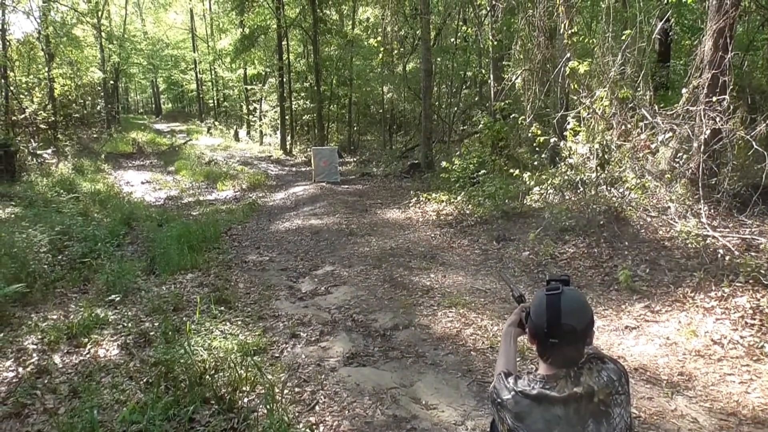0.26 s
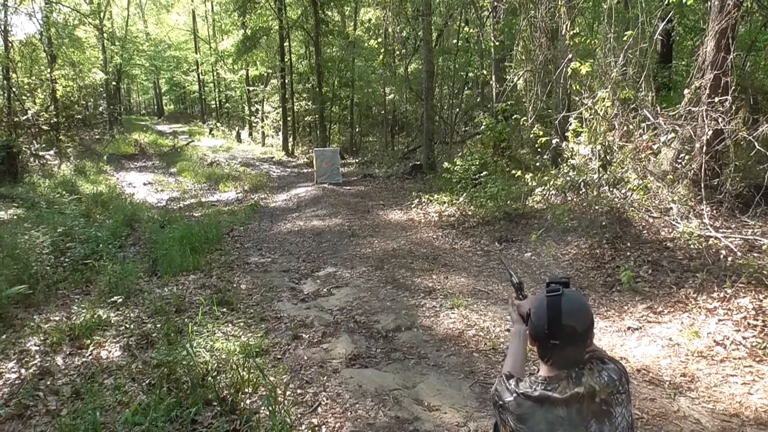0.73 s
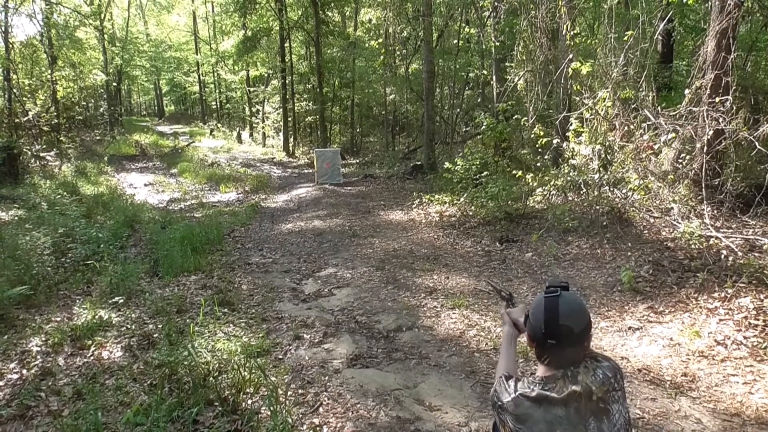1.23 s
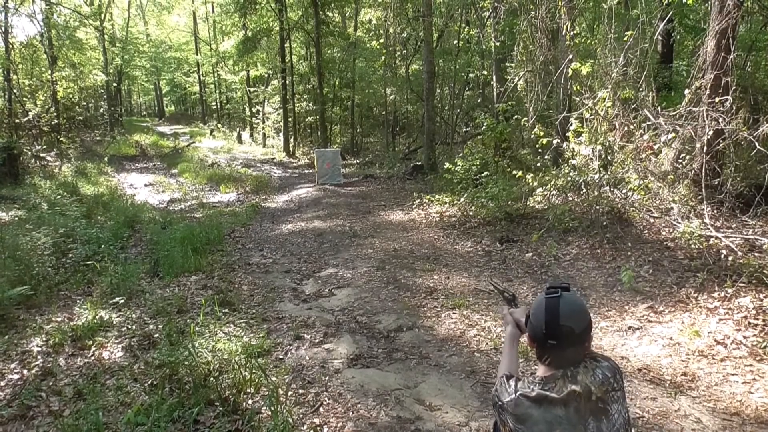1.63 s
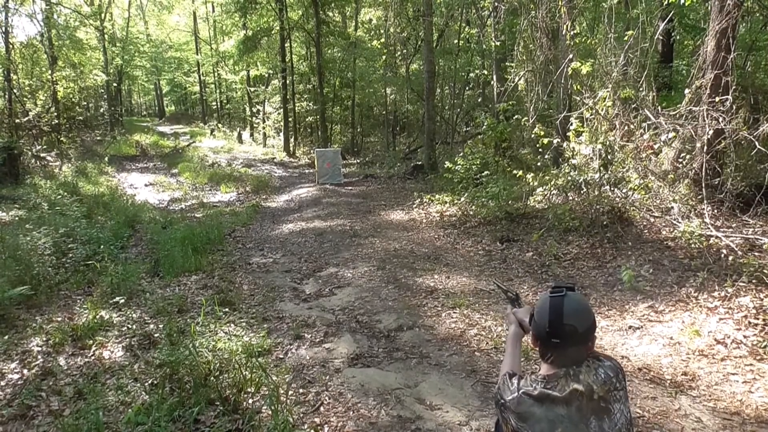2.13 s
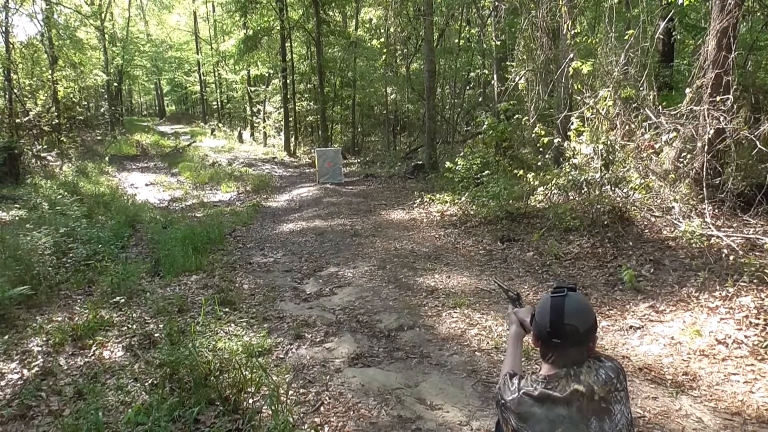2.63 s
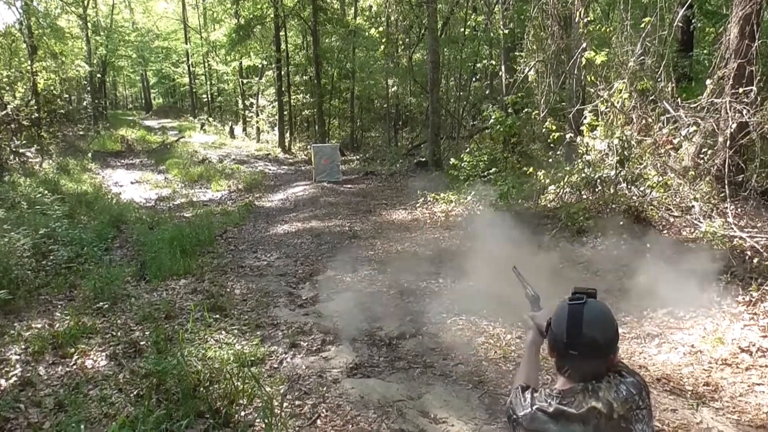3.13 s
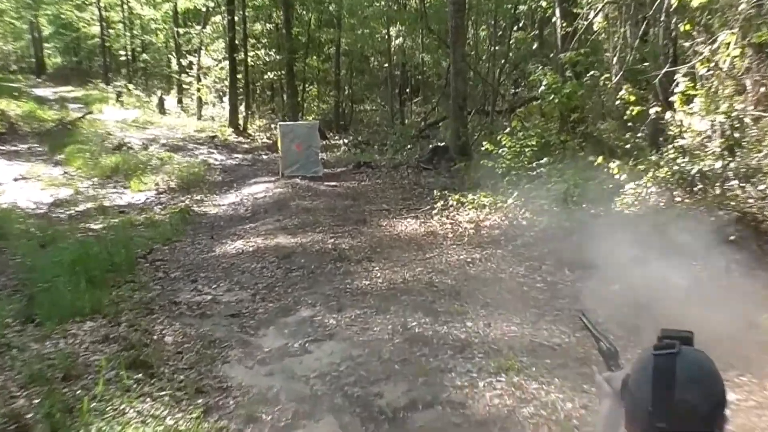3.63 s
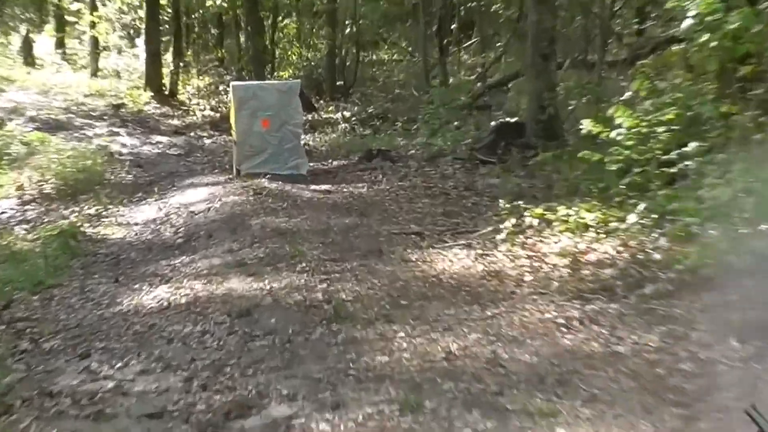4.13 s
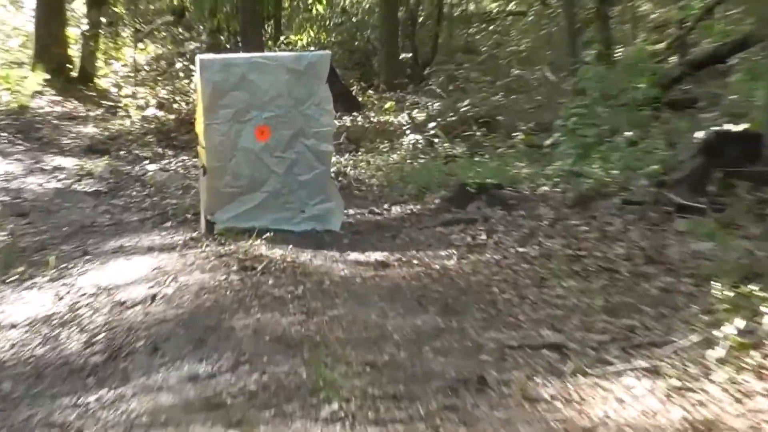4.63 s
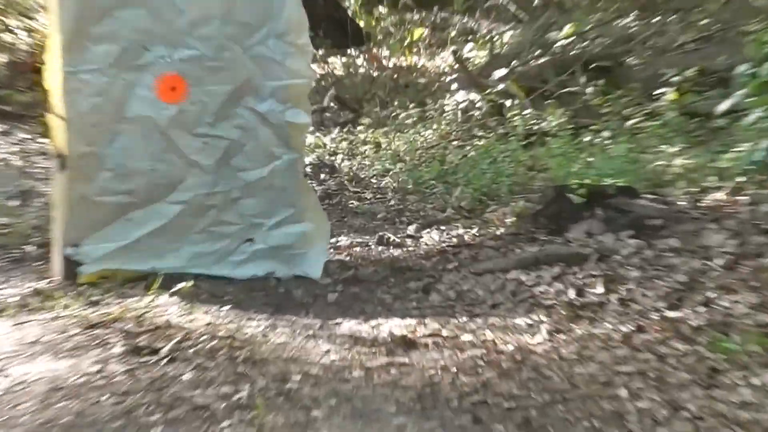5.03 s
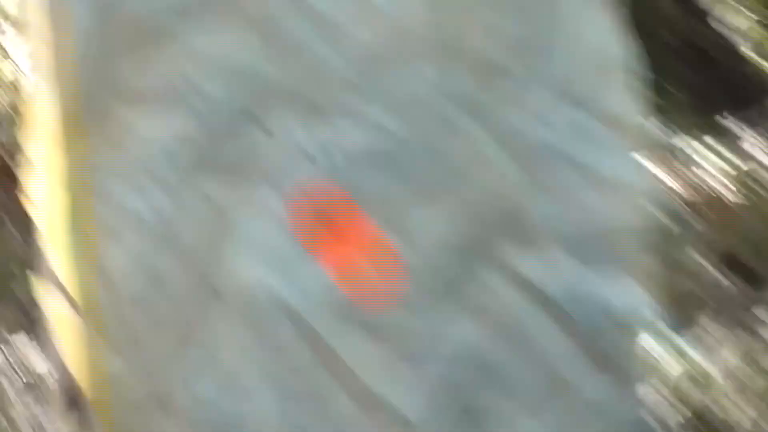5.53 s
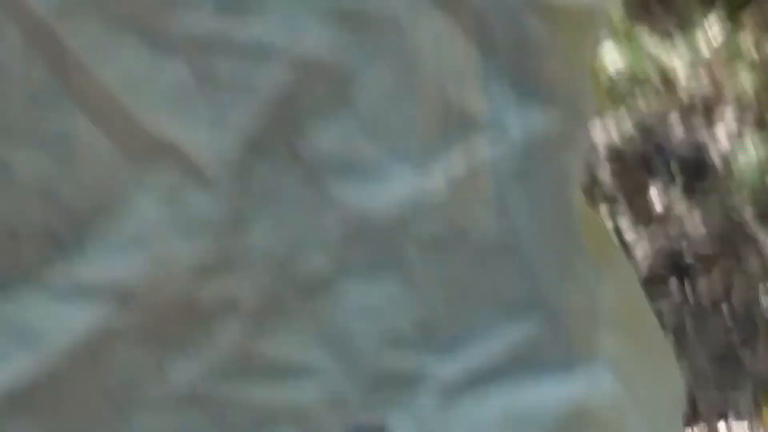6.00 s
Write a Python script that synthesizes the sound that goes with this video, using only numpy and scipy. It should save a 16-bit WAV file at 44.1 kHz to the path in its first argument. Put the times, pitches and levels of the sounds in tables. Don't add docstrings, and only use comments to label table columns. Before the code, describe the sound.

Outdoors in woodland, heard from just behind the shooter: low traffic hum and faint leaf hiss. A revolver is cocked at once in bright, tight steel clicks. After a quiet wait with a few tiny bird chips and light rustles, one huge shot cracks and hisses at about three seconds, its boom rolling through the trees and fading over two seconds. The hammer is then cocked again with sharp clicks.

```python
import sys
import numpy as np
from scipy import signal
from scipy.fft import rfft, irfft, next_fast_len
from scipy.io import wavfile
from scipy.ndimage import uniform_filter1d, map_coordinates

SR = 44100
rng = np.random.default_rng(int(sys.argv[2]) if len(sys.argv) > 2 else 0)


def wav_out(sig):
    wavfile.write(sys.argv[1], SR, np.round(np.clip(np.atleast_2d(sig).T, -1, 1) * 32767).astype(np.int16))


def amplitude_ratio(level_db):
    exponent = np.asarray(level_db, float) / 20
    return 10 ** exponent


N = 276066
SHOT_S = 3.054


def unit(x):
    return x / np.sqrt(np.mean(x ** 2) + 1e-20)


def along(points, hz):
    f, v = np.transpose(points)
    return np.interp(np.log(hz + 1), np.log(f + 1), v)


def sides(pan_db):
    return amplitude_ratio([[pan_db / 2], [-pan_db / 2]])


def add(track, s, piece):
    part = track[:, round(s * SR):][:, :piece.shape[1]]
    part += piece[:, :part.shape[1]]


def wobble(rate):
    return map_coordinates(rng.standard_normal(400), [np.arange(N) * rate / SR])


def rush(spectrum, alike, patchy_db, loss_db=lambda hz, s: 0):
    hz, s, z = signal.stft(rng.standard_normal((2, N)), SR, nperseg=512)
    field = uniform_filter1d(rng.standard_normal(z.shape[1:]), size=5, axis=0)
    field = unit(uniform_filter1d(field, size=6, axis=1))
    turn = np.arccos(np.clip(along(alike, hz), -1, 1))[:, None] / 2
    mid, side = z[0] * np.cos(turn), z[1] * np.sin(turn)
    z = np.array([mid + side, mid - side]) * amplitude_ratio(patchy_db * field)
    pair = signal.istft(z * amplitude_ratio(loss_db(hz[:, None], s)), SR, nperseg=512)[1][:, :N]
    colour = amplitude_ratio(along(spectrum, np.fft.rfftfreq(N, 1 / SR)))
    return irfft(rfft(pair) * colour / np.sqrt(np.mean(colour ** 2)), N)


# frequency_hz, t60_s
TRUNK_DECAY = [(1500, .8), (3500, 1), (7000, 0.87), (12000, 0.33), (15000, .3)]


def woods(piece):
    hz, s, z = signal.stft(rng.standard_normal((2, SR // 2)), SR, nperseg=256)
    decay = amplitude_ratio(-60 * s / along(TRUNK_DECAY, hz)[:, None])
    tail = signal.istft(z * decay, SR, nperseg=256)[1]
    return signal.fftconvolve(piece, tail / np.linalg.norm(tail[0]), axes=1)


def camera_gain_db():
    drop_db, back_db_per_s = 16, 21.5
    after = np.arange(N) / SR - SHOT_S
    return np.minimum(back_db_per_s * after - drop_db, 0) * (after > 0)


# frequency_hz, density_db
TRAFFIC_COLOUR = [(15, -62.5), (25, -32), (48, -8.5), (78, -5), (140, -2), (172, -6.5), (408, -8),
                  (651, -9.5), (715, -11), (929, -13), (1760, -27), (2200, -34), (2860, -55), (4840, -120)]
# time_s, level_db
BACKGROUND_SWELL = [(0, 2), (.6, .5), (3, .5), (5.4, 2), (6.3, 0)]
# frequency_hz, density_db
LEAF_COLOUR = [(1290, -25), (2200, -3.5), (2850, -1.5), (3550, -2.5), (4460, -2.5), (4650, -2.5),
               (6080, -4.5), (9580, -4.5), (13500, -8.5), (15100, -12), (16000, -15.5), (16400, -31.5)]
# frequency_hz, likeness
BACKGROUND_ALIKE = [(60, 0.95), (130, 1), (290, 0.76), (640, 0.75), (1410, 0.38), (3100, 0.51),
                    (6820, 0.29), (15000, 0.047)]
# start_s, level_db, half_length_s
RUSTLES = [(.26, -63, .03), (.35, -55, .03), (5.4, -62, .02), (5.515, -61, .025), (5.575, -57, .03),
           (1.56, -66, .02), (1.85, -66, .02), (2.64, -57.5, 0.035), (2.815, -56, 0.021), (2.9, -58, 0.014),
           (5.674, -77, .02), (5.808, -68, 0.012), (5.896, -66, 0.014)]
# frequency_hz, density_db
RUSTLE_COLOUR = [(700, -34), (1500, 3), (2700, 6), (4000, 6), (5800, 1), (9000, 2), (13000, -10),
                 (16000, -33)]


def background():
    t = np.arange(N) / SR
    traffic = amplitude_ratio(-49 + camera_gain_db()) * rush(TRAFFIC_COLOUR, BACKGROUND_ALIKE, patchy_db=0.72)
    leaves = amplitude_ratio(-62.5) * rush(LEAF_COLOUR, BACKGROUND_ALIKE, patchy_db=1.05)
    swell = amplitude_ratio(np.interp(t, *np.transpose(BACKGROUND_SWELL)))
    puffs = sum(amplitude_ratio(db) * np.exp(-((t - s) / half) ** 2) for s, db, half in RUSTLES)
    rustles = puffs * rush(RUSTLE_COLOUR, [(1000, 0.38)], patchy_db=.7)
    return swell * (traffic + leaves) + rustles


# frequency_hz, width_hz, level_db
STEEL_MODES = [(1230, 560, -5), (2100, 690, -1), (3290, 730, 3), (4750, 290, -6), (6100, 590, -14),
               (7030, 890, 3.5), (8330, 370, 3), (9530, 780, -2.5), (10960, 920, -2), (11830, 450, 2.5),
               (13280, 1220, 0), (13780, 1900, -5.5)]
PARTS = {"hand": (-14, -16, -8, -2, .016), "bolt": (-28, -21, -26, -15, .004),
         "spring": (-19, -12, -17, -6, .009), "sear": (-9, -14, -14, -1, .018),
         "hammer": (-12, -3, 2, -5, .025), "tick": (-22, -18, -18, -5, .006)}
CONTACTS = {"hand": [(.0195, -14), (.2172, -25), (5.3746, -13.5)], "bolt": [(.2116, 0), (.905, -42),
            (3.2468, -18), (5.4747, -3)], "spring": [(.053, -42), (.213, -14), (.301, -46), (.3152, -21),
            (5.5435, -29), (5.5463, -17)], "sear": [(.318, -15), (.3215, -22), (5.476, -20), (5.5481, -21),
            (5.551, -27)], "hammer": [(3.0482, -16)], "tick": [(.541, -41.5), (4.6152, -32), (5.8055, -48)]}


def lock():
    out, t = np.zeros((2, N)), np.arange(4096) / SR
    f = np.fft.rfftfreq(len(t), 1 / SR)
    blows = [(s, db, *PARTS[part]) for part in PARTS for s, db in CONTACTS[part]]
    for s, db, grip_db, frame_db, barrel_db, cylinder_db, t60 in blows:
        woken_db = [(2100, grip_db), (3600, frame_db), (4700, barrel_db), (7800, cylinder_db), (11800, 0)]
        steel = 0
        for k, (centre, width, level) in enumerate(STEEL_MODES):
            strength = (-1) ** k * amplitude_ratio(level + along(woken_db, centre))
            damping = 1j * f * width
            steel = steel + strength * damping / (centre * centre - f * f + damping)
        shared, own = rng.standard_normal(len(t)), rng.standard_normal((2, len(t)))
        envelope = amplitude_ratio(-60 * t / t60) + amplitude_ratio(-27 - 60 * t / 0.04)
        rattle = (shared + 0.86 * own) * envelope * (t < .05)
        rattle[:, 0] = 5
        click = irfft(rfft(rattle) * steel, len(t))
        click *= amplitude_ratio(db) * sides(-0.9) / np.abs(click).max()
        add(out, s, click)
        add(out, s + .004, amplitude_ratio(-13.5) * woods(click))
    return out


# start_s, level_db
CHIPS = [
    (.334, -46.5),
    (1.486, -47),
    (2.495, -44),
    (4.114, -41.5),
    (4.729, -40),
    (5.435, -42),
    (5.989, -42),
]
# start_s, level_db
SEEPS = [
    (2.357, -52.5),
    (3.995, -56),
]
# start_hz, end_hz, length_s
CHIP_GLIDE = (6150, 8300, .012)
SEEP_GLIDE = (7300, 7850, .018)


def bird():
    out = np.zeros((2, N))
    notes = [(*note, *CHIP_GLIDE) for note in CHIPS] + [(*note, *SEEP_GLIDE) for note in SEEPS]
    for s, db, from_hz, to_hz, length in notes:
        u = np.linspace(0, 1, round(length * SR))
        hz = from_hz + (to_hz - from_hz) * np.sin(np.pi / 2 * u)
        whistle = np.sin(np.pi * u) ** .5 * np.sin(2 * np.pi * np.cumsum(hz) / SR)
        chip = amplitude_ratio(db) * sides(0.75) * whistle
        add(out, s, amplitude_ratio(-23) * chip)
        add(out, s, amplitude_ratio(2) * woods(chip))
    return out


# frequency_hz, density_db
JET_COLOUR = [(900, -23), (1500, -5), (2200, -6), (3500, -9.5), (5500, -10), (7500, -5.5), (9500, -2),
              (11500, -4.5), (14000, -9), (15800, -12)]


def jet():
    rise_s, spit_db, spit_s = .0012, 6, .006
    fall_db_per_s, lasts_s, end_db_per_s = 75, .06, 300
    after = np.arange(N) / SR - SHOT_S
    since = np.maximum(after, 0)
    level_db = -17 + spit_db * np.exp(-since / spit_s) - fall_db_per_s * since
    level_db -= end_db_per_s * np.maximum(after - lasts_s, 0)
    opening = np.clip(after / rise_s + 1, 0, 1) ** 2
    return opening * amplitude_ratio(level_db) * rush(JET_COLOUR, [(1500, 0.49), (8000, 0.19)], patchy_db=1.5)


# delay_s, level_db, swing_hz
MUZZLE = [
    (.0003, -10, 1300),
    (.0008, -1.5, 540),
    (.006, -6, 165),
    (.036, -10, 270),
]
# delay_s, level_db, pan_db
BOUNCES = [
    (.003, -9.5, 16),
    (.0045, -9.5, -12),
]
# start_s, level_db, pan_db
TRUNKS = [
    (3.0795, -14, -10),
    (3.0865, -9, 2),
    (3.0885, -11, 6),
    (3.092, -12, 0),
    (3.105, -14, 0),
    (3.124, -14, 0),
    (3.1324, -7, 0),
    (3.237, -13.5, 2),
    (3.502, -15, 5),
    (3.541, -12, -5),
]


def swings():
    trunk_hz, half_pitch_s = 950, .1
    out, t = np.zeros((2, N)), np.arange(SR // 40) / SR
    main_s, _, main_hz = MUZZLE[1]
    waves = [(SHOT_S + s, db, -1, hz) for s, db, hz in MUZZLE]
    waves += [(SHOT_S + main_s + s, db, pan_db, main_hz) for s, db, pan_db in BOUNCES]
    waves += [(s, db, pan_db, trunk_hz / (1 + (s - SHOT_S) / half_pitch_s)) for s, db, pan_db in TRUNKS]
    for s, db, pan_db, hz in waves:
        u = t * hz * 2.4
        swing = u * np.exp(-u) * np.sin(2 * np.pi * hz * t)
        add(out, s, -amplitude_ratio(db + 8) * sides(pan_db) * swing)
    return out


# frequency_hz, density_db
ECHO_COLOUR = [(150, -30), (260, -4), (304, -8), (374, -5), (415, -6), (577, -3.5), (663, -5.5), (1100, -6),
               (1720, -16.5), (9920, -18.5), (15000, -30), (16400, -52)]
# frequency_hz, likeness
ECHO_ALIKE = [(60, 0.9), (130, 0.9), (290, 0.75), (640, 0.81), (1410, 0.55), (3100, 0.61), (6820, 0.2),
              (15000, 0.18)]
# frequency_hz, loss_db_per_s
AIR_LOSS = [(200, 1.5), (1000, -0.5), (2000, 6), (3000, 13.5), (5000, 24.5), (7500, 36), (10000, 47),
            (12000, 55), (14000, 73)]
# frequency_hz, density_db
BOOM_COLOUR = [(18, -62), (30, -32), (43, -25.5), (106, -6), (172, 2), (240, -5), (310, -45), (530, -120)]
# frequency_hz, change_db_per_s
BOOM_SINKS = [(60, 14), (110, 9), (170, -4), (250, -4)]


def roll():
    near_db, near_s, near_ends_s = 3, .1, .015
    ridge_db, ridge_s, ridge_half_s = 3, .41, .1
    after = np.arange(N) / SR - SHOT_S
    level = amplitude_ratio(-8.7 - 20.5 * after) + amplitude_ratio(-38 - 8.5 * after)
    near = near_db * np.clip((near_s - after) / near_ends_s, 0, 1)
    ridge = ridge_db * np.exp(-((after - ridge_s) / ridge_half_s) ** 2)
    level = level * amplitude_ratio(camera_gain_db() + near + ridge) * np.clip(after / 0.01, 0, 1)

    def dull(hz, s):
        return -along(AIR_LOSS, hz) * np.clip(s - SHOT_S - .13, -.05, 1.5)

    def deeper(hz, s):
        return along(BOOM_SINKS, hz) * np.clip(s - SHOT_S - .7, -1, .25)

    answer = amplitude_ratio(1.5) * rush(ECHO_COLOUR, ECHO_ALIKE, patchy_db=1.0, loss_db=dull)
    boom_level = amplitude_ratio(-8.5 + .3 * ridge + 1.5 * wobble(14))
    boom = boom_level * rush(BOOM_COLOUR, [(100, .89)], patchy_db=1.5, loss_db=deeper)
    return level * (answer + boom)


def shot():
    return swings() + jet() + roll()


def scene():
    return background() + lock() + bird() + shot()


def ragged_treble(x):
    first_cut_s, first_cut_hz = 3.09, 15700
    sink_s, sink_hz, sink_hz_per_s = 3.27, 14200, 6000
    lowest_s, jump_hz, climb_hz_per_s = 3.66, 900, 4500
    steady_hz, tattered_hz, tatters_fade_s = 450, 2800, 1.2
    hz, s, z = signal.stft(x, SR, nperseg=2048)
    back = np.maximum(s - lowest_s, 0)
    edge_hz = sink_hz - sink_hz_per_s * (s - back - sink_s) + climb_hz_per_s * back + jump_hz * (back > 0)
    ragged_hz = np.where(back > 0, tattered_hz * np.clip(1 - back / tatters_fade_s, 0, 1), steady_hz)
    luck = rng.standard_normal((len(hz) // 4 + 1, len(s)))
    luck = np.repeat(luck, 4, axis=0)[:len(hz)]
    edge_hz = np.where(s < sink_s, first_cut_hz, edge_hz + ragged_hz * luck)
    kept = (hz[:, None] < edge_hz) | (s < first_cut_s)
    treble = np.clip(hz[:, None] / 11000 - 1, 0, .25) * 4
    tatters = (ragged_hz > steady_hz) * ragged_hz / tattered_hz
    return signal.istft(z * kept * amplitude_ratio(6 * treble * tatters), SR, nperseg=2048)[1][:, :N]


# frequency_hz, gain_db
MIC_RESPONSE = [(25, -24), (45, -9.5), (80, -2.5), (1100, 0), (1450, 1.5), (1750, -2.5), (2150, 2.5),
                (2750, -4), (3700, 1), (5600, -1.5), (8000, 2), (15700, -2), (16000, -14), (16900, -54)]


def top_cut(x):
    return signal.sosfilt(signal.butter(12, 16800, fs=SR, output="sos"), x)


def record(dry):
    size = next_fast_len(N + SR // 4)
    cepstrum = irfft(np.log(amplitude_ratio(along(MIC_RESPONSE, np.fft.rfftfreq(size, 1 / SR)))), size)
    cepstrum[1:size // 2] *= 2
    response = np.exp(rfft(cepstrum[:size // 2], size))
    heard = irfft(rfft(dry, size) * response, size)[:, :N]
    clipped = heard / (1 + np.abs(heard / .96) ** 6) ** (1 / 6)
    mix = ragged_treble(clipped)
    return top_cut(mix)


dry = scene()
out = record(dry)
wav_out(out)
```